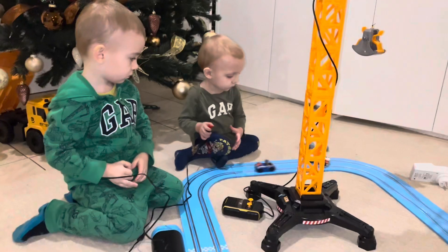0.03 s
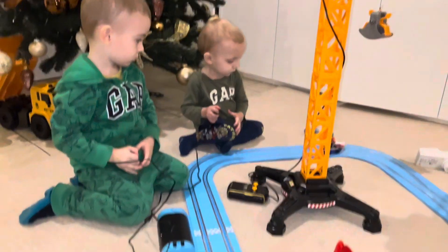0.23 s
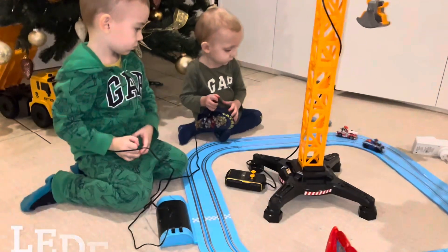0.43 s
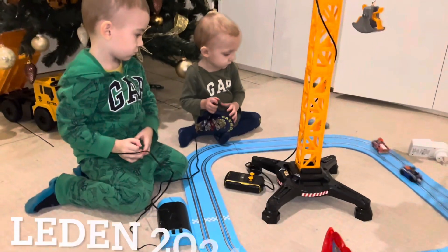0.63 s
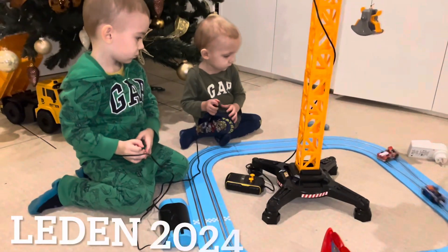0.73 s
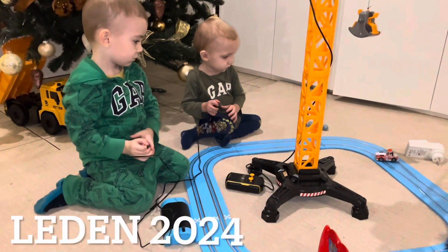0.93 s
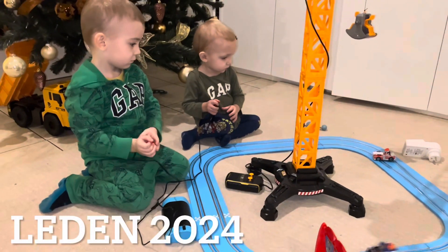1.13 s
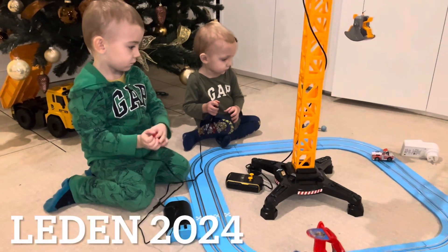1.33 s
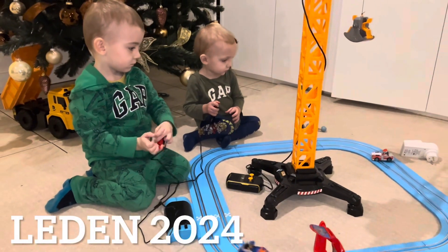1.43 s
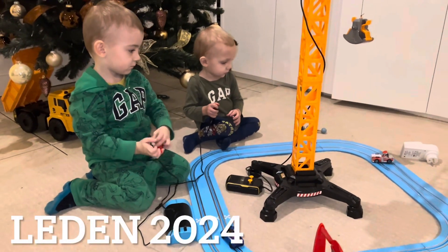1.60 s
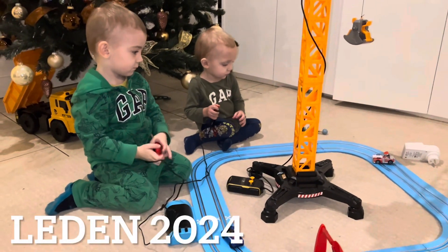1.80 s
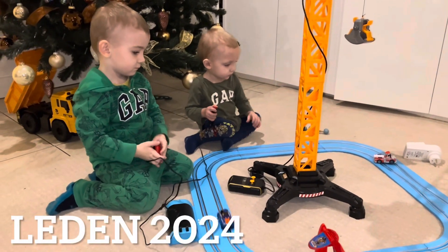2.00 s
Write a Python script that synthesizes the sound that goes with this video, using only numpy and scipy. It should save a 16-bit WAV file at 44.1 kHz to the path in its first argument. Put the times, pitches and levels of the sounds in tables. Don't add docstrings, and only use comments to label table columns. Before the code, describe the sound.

Toy slot cars buzz around a plastic track indoors, pause briefly, and one motor starts whirring again

```python
import sys
import numpy as np
from scipy import signal
from scipy.fft import rfft, irfft, next_fast_len
from scipy.io import wavfile
from scipy.ndimage import uniform_filter1d, map_coordinates

SR = 44100
rng = np.random.default_rng(int(sys.argv[2]) if len(sys.argv) > 2 else 0)


def boost(x):
    u = np.asarray(x, float) / 20
    return 10 ** u


def waveform_to_disk(signal):
    frames = np.transpose(np.atleast_2d(signal))
    scaled = np.clip(frames, -1, 1) * 32767
    samples = np.round(scaled).astype(np.int16)
    wavfile.write(sys.argv[1], SR, samples)


N = 90669
T = np.arange(N) / SR
CHASSIS_CUT_HZ = 543

# centre [Hz], width [Hz], level [dB].
SHELL = [(2108, 233, -1.5), (2402.5, 267, 2.5), (2720, 360, -3), (3650, 554, -6.5), (4990, 1460, -14)]
# start [s], T60 of the rattle [s].
CLICK_TIMES = [
    (.2322, .05),
    (.241, .035),
    (.257, .08),
    (1.2624, .08),
    (1.2692, .02),
    (.72, .08),
]
# level [dB], treble [dB], air [dB], first contact [dB].
CLICK_LEVELS = [
    (-15, -3, -2, -19),
    (-12, -12, -10, -17),
    (-19, -8, -15, -40),
    (-22, -3, -8, -25),
    (-29, 3, 0, -26),
    (-26.5, -10, -13, -45),
]
# start [s], length [s], pitch [Hz].
HUM_TONES = [(1.88, .105, 750), (1.945, .07, 300), (1.925, .08, 940), (2.0, .06, 850), (2.02, .05, 980),
             (2.0, .07, 1400), (.19, .07, 700), (.6, .15, 585), (.08, .07, 1280), (.08, .07, 1420),
             (1.15, .3, 2430), (1.26, .08, 728)]


def unit(x):
    return x / np.sqrt(np.mean(x ** 2) + 1e-20)


def along(points, hz):
    f, v = np.transpose(points)
    return np.interp(np.log(hz + 1), np.log(f + 1), v)


def curves(rows, t=T):
    s, *cols = np.transpose(rows)
    return [np.interp(t, s, c) for c in cols]


def wobble(rate):
    return map_coordinates(rng.standard_normal(2000), [np.arange(N) * rate / SR])


def swell(s, length):
    return np.sin(np.pi * np.clip((T - s) / length, 0, 1))


def filtered(x, response):
    m = next_fast_len(N + SR // 2)
    return irfft(rfft(x, m) * response(np.fft.rfftfreq(m, 1 / SR)), m)[..., :N]


def body(x, peaks):
    def response(f):
        total = 0
        for k, (centre, width, db) in enumerate(peaks):
            damping = 1j * f * width
            total = total + (-1) ** k * boost(db) * damping / (centre ** 2 - f * f + damping)
        return total
    return filtered(x, response)


def high(x, cut_hz):
    return filtered(x, lambda hz: 1 / (1 + (cut_hz / (hz + 1)) ** 16))


def rattle(rate, scatter, hiss_db):
    size_db, knock_s = 5, 0.005
    size, shift = rng.standard_normal((2000, 2)).T
    teeth = np.arange(1, 2001) + scatter * np.tanh(shift)
    at = np.searchsorted(np.cumsum(rate) / SR, teeth)
    blows = np.bincount(at, boost(size_db * size), N + 1)[:N]
    gate = np.abs(signal.lfilter([1], [1, -np.exp(-1 / (knock_s * SR))], blows))
    gate /= np.sqrt(np.abs(uniform_filter1d(gate ** 2, size=2600)) + 1e-3)
    return (gate + boost(hiss_db)) * rng.standard_normal((2, N))


def patchy(x):
    z = signal.stft(x, nperseg=512)[2]
    field = uniform_filter1d(rng.standard_normal(z.shape[1:]), size=5, axis=0)
    field = uniform_filter1d(field, size=8, axis=1)
    return signal.istft(z * boost(3 * unit(field)), nperseg=512)[1][:, :N]


def cars():
    # time in seconds, then level, brightness, chassis and hollow track in dB.
    run = [(.05, -49, 7.5, 4.5, 8.5), (.11, -36, 1, 1.5, 0), (.21, -40.5, 3, 1.5, 3), (.3, -40, 6, 1, 6),
           (.4, -40, 2.5, 7, 2.5), (.52, -40, 5, 2, -23), (.62, -38, 2.5, 2.5, -3),
           (.7, -35.5, 1.5, -2, -7), (.76, -37.5, 1, 8.5, 4.5), (.88, -40, 3.5, 1, 1),
           (.97, -40, 5, 0, -21), (1.06, -40.5, 3.5, 3, -1), (1.12, -38, 2, 1.5, 12.5),
           (1.25, -36.5, -1.5, 2, 5.5), (1.33, -33.5, 0, -0.5, 9.5), (1.47, -40, 10, 1.5, 9.5),
           (1.55, -42, 0.5, -0.5, -27), (1.8, -74.5, -1, -7, -11)]
    # resonance in Hz, width in Hz, level in dB.
    chassis = [(596, 74, -7.5), (758, 101, -6.5), (1050, 335, -7.5), (1512, 386, -9)]
    axle = [(5900, 880, -10), (9200, 1300, -12.5), (10500, 5100, -18), (16200, 530, -71)]
    track_peaks = [(309, 47, -22), (449, 39, -15.5)]
    # time in seconds, level over the shell in dB.
    whine_level = [
        (.05, 0.5),
        (.3, -6.5),
        (.57, -4),
        (.69, -3),
        (.9, -13.5),
        (1.15, -16),
        (1.35, -4),
        (1.5, -1),
        (1.75, -6.5),
    ]
    # frequency in Hz, density in dB per Hz.
    rumble = [(20, -15), (60, -10.5), (130, 0.5), (230, -0.5), (300, -25), (400, -60)]
    teeth_per_s, scatter, hiss_db = 700, 0.45, 1
    power_off_s, power_off_db, leak_db, rumble_db = 1.479, -6, -16.5, -45.5

    level_db, bright_db, chassis_db, hollow_db = curves(run)
    drive = patchy(rattle(np.full(N, teeth_per_s), scatter, hiss_db))
    shell = body(drive, SHELL)
    narrow = [(2570, 380, 0)]
    whine_db = curves(whine_level)[0] + 3 * wobble(29.86)
    whine = boost(whine_db) * unit(body(body(drive, narrow), narrow)) * np.std(shell)
    car = shell + whine + boost(chassis_db) * body(drive, chassis) + boost(bright_db) * body(drive, axle)
    track = boost(hollow_db + 5.1 * wobble(25.24)) * high(body(drive, track_peaks), 270)
    boards = boost(rumble_db) * unit(filtered(drive, lambda hz: boost(along(rumble, hz))))
    mix = (high(car, CHASSIS_CUT_HZ) + boost(leak_db) * car + track) / np.std(shell) * 0.75
    total_db = level_db + power_off_db * (T > power_off_s) + 0.067 * wobble(16.0)
    return boost(total_db) * (mix + boards)


def squeals():
    # start in seconds, length in seconds, level in dB, pitch in Hz.
    scrapes = [
        (0.996, 0.24, -39.5, 6200),
        (0.51, 0.31, -45.5, 5960),
        (1.373, 0.09, -41.5, 5450),
    ]
    out = np.zeros((2, N))
    for s, length, db, hz in scrapes:
        noise = rng.standard_normal((2, N))
        tone = unit(body(body(noise, [(hz, 750, 0)]), [(hz, 1500, 0)]))
        out += boost(db + 4 * wobble(250)) * swell(s, length) * tone
    return out


def clicks():
    # resonance in Hz, width in Hz, level in dB.
    low_peaks = [(850, 500, -7), (1950, 800, -4), (2700, 700, -1)]
    top_peaks = [(5200, 3300, -4), (9900, 2600, -15)]
    air_peaks = [(11700, 900, -9), (14500, 2800, -16)]
    snap_db, grain_db, air_t60_share, ceiling = 13, 3, 0.62, 0.16
    out = np.zeros((2, N))
    for (s, t60), (db, treble_db, air_db, _) in zip(CLICK_TIMES, CLICK_LEVELS):
        noise = (T >= s) * rng.standard_normal((2, N)) * boost(grain_db * wobble(300))
        noise[0, round(s * SR)] = boost(snap_db)
        age = np.clip(T - s, 0, None)
        dying = noise * boost(-60 * age / t60)
        air = noise * boost(-60 * age / (t60 * air_t60_share))
        click = body(dying, low_peaks) + boost(treble_db) * body(dying, top_peaks)
        click = click + boost(air_db) * high(body(air, air_peaks), 12000)
        out += boost(db) * click
    return high(out / (1 + np.abs(out / ceiling) ** 4) ** 0.25, CHASSIS_CUT_HZ)


def ticks():
    # resonance in Hz, width in Hz, level in dB.
    contact = [(2630, 830, 15.5), (7000, 7200, 4)]
    spark = [(9200, 1500, -9), (12200, 2800, 7), (15400, 1100, 9)]
    # time in seconds, width in seconds, level in dB.
    edges = [
        (0.234, 0.0039, -40),
        (1.2635, .003, -46),
        (1.2684, 0.004, -37),
    ]
    blows = np.zeros(N)
    for (s, _), row in zip(CLICK_TIMES, CLICK_LEVELS):
        blows[round(s * SR)] = 2 * boost(row[-1])
    fizz = unit(high(body(rng.standard_normal(N), spark), 8000))
    flash = sum(boost(db) * np.exp(-((T - s) / width) ** 2) for s, width, db in edges)
    return body(blows, contact) + fizz * flash


def knocks(rows, peaks):
    rise_s, t60_s = 0.00064, 0.021
    start, db = np.transpose(rows)
    age = np.clip(T - start[:, None], 0, None)
    gate = boost(db) @ ((1 - np.exp(-age / rise_s)) * boost(-60 * age / t60_s))
    noise = rng.standard_normal((2, N))
    return body(gate * noise, peaks) / np.std(body(noise, peaks))


def coasting():
    # time in seconds, level in dB.
    last_teeth = [
        (1.448, -37),
        (1.459, -37),
        (1.474, -36),
        (1.516, -43),
        (1.528, -41),
        (1.537, -44),
        (1.589, -47),
        (1.631, -52),
    ]
    return knocks(last_teeth, SHELL)


def restart():
    # time in seconds, level in dB, knocks per second.
    speed_up = [
        (1.77, -74, 60),
        (1.81, -64, 60),
        (1.85, -60, 60),
        (1.88, -48, 80),
        (1.93, -47.5, 186),
        (1.98, -42.5, 250),
        (2.06, -39, 380),
    ]
    # resonance in Hz, width in Hz, level in dB.
    motor_peaks = [(291, 130, -17.5), (1522, 2900, -11.5), (2580, 310, 2.5), (4150, 480, -1),
                   (5900, 1670, -5), (8000, 1900, -10.5), (12500, 7700, -17.5)]
    # time in seconds, level in dB.
    slack_teeth = [(1.811, -73), (1.827, -60.5), (1.841, -44), (1.853, -48), (1.871, -50), (1.887, -48),
                   (1.906, -38), (1.916, -37), (1.929, -50), (1.938, -45), (1.942, -48), (1.956, -44)]
    start_s, mesh_s = 1.77, 1.92
    level_db, rate = curves(speed_up)
    on = T > start_s
    whir = body(rattle(rate * (T > mesh_s), 0.15, -1), motor_peaks)
    return boost(level_db) * on * whir / np.std(whir[:, on]) + knocks(slack_teeth, motor_peaks[2:-1])


def hums():
    tone_db = [-60, -60.5, -65.5, -58, -55, -57, -45, -48.5, -44.5, -50.5, -40, -45.5]
    out = np.zeros((2, N))
    for (s, length, hz), db in zip(HUM_TONES, tone_db):
        level = boost(db + 1.5 * wobble(90)) * np.abs(swell(s, length)) ** 0.5
        phase = 2 * np.pi * np.cumsum(hz * (1 + 0.004 * wobble(90))) / SR
        out += level * np.sin(phase + [[0], [rng.normal(0, 0.57)]])
    return out


def room(x, before):
    # frequency in Hz, T60 in seconds.
    decay = [(300, 0.79), (2500, 0.55), (7000, 0.15), (14000, 0.022)]
    turn_s = 0.2
    whole, out = np.r_[before, x], 0
    time = np.arange(len(whole)) / SR
    for s in np.arange(0, len(whole) / SR + turn_s, turn_s):
        hz, t, z = signal.stft(rng.standard_normal((2, SR // 2)), SR, nperseg=256)
        dying = z * boost(-60 * t / along(decay, hz)[:, None])
        tail = signal.istft(dying, SR, nperseg=256)[1]
        part = whole * np.cos(np.pi / 2 * np.clip((time - s) / turn_s, -1, 1))
        out = out + signal.fftconvolve(part[None], tail / np.linalg.norm(tail[0]), axes=1)
    return out[:, len(before) - 300:][:, :N]


def hush():
    # frequency in Hz, density in dB per Hz.
    floor = [(20, -44), (60, -21), (150, -19.5), (500, -21), (1000, -12.5), (2500, -18.5), (6000, -27),
             (15000, -55)]
    noise = rng.standard_normal((2, N))
    return boost(-64) * unit(filtered(noise, lambda hz: boost(along(floor, hz))))


def ports(pair):
    # frequency in Hz, likeness of the ports from 0 to 1.
    alike = [(60, 0.2), (250, 1), (700, 0.27), (2500, 0.044), (6000, 0.093), (9000, 0.13), (13000, 0.2)]
    # frequency in Hz, radians by which the left port leads.
    left_lead = [(0, 0.5), (7000, -6), (8500, -10.5), (10300, -8.5), (11500, -10), (12200, -14), (14000, 2),
                 (15500, -24)]

    def blend(hz):
        angle = np.arccos(np.clip(along(alike, hz), -1, 1)) / 2
        return np.array([np.cos(angle), np.sin(angle)])

    def lead(hz):
        half = 0.5 * np.interp(hz, *np.transpose(left_lead))
        return np.exp(1j * half * np.array([[1], [-1]]))

    same, other = filtered(pair, blend)
    return filtered(np.array([same + other, same - other]), lead)


def scene():
    run_room, click_room = boost(-6), boost(-0.5)
    running = cars() + squeals() + restart() + coasting()
    snaps = clicks()
    earlier = run_room * running[0, SR // 2::-1]
    wet = room(run_room * running[0] + click_room * snaps[0], earlier)
    return ports(running + snaps + wet + hush()) + hums() + ticks()


def roll_off(x):
    return signal.sosfilt(signal.butter(12, 15810, fs=SR, output="sos"), x)


def record(dry):
    # time in seconds, centre in Hz, width in Hz, depth in dB.
    low_hole = [(.24, 570, 80, 0), (.3, 570, 80, 7), (.57, 560, 80, 9), (.64, 480, 70, 5),
                (.74, 440, 90, 0), (1.56, 320, 100, 0), (1.66, 370, 130, 26), (1.785, 410, 150, 32),
                (1.81, 490, 100, 18), (1.87, 540, 130, 27), (1.92, 570, 110, 22), (2, 560, 120, 18),
                (2.05, 620, 60, 16)]
    high_hole = [
        (1.81, 800, 200, 0),
        (1.85, 950, 300, 18),
        (1.875, 1100, 400, 26),
        (1.91, 1300, 430, 30),
        (1.94, 1300, 350, 24),
        (1.98, 1150, 250, 18),
        (2.02, 1120, 150, 18),
        (2.06, 1150, 80, 5),
    ]
    port_null = [(0, 10400, 450, 5), (.17, 10300, 500, 10), (.24, 10400, 400, 0), (.33, 10700, 400, 12),
                 (.42, 10500, 450, 4), (.74, 10300, 450, 4), (.8, 10300, 550, 9), (.9, 10300, 650, 17),
                 (.97, 10400, 500, 5), (1.03, 10300, 650, 14), (1.12, 10400, 400, 4),
                 (1.22, 10300, 650, 15), (1.27, 10400, 400, 0), (1.32, 10500, 750, 15),
                 (1.44, 9900, 1100, 20), (1.48, 10400, 500, 6), (1.6, 10400, 500, 13),
                 (2.06, 10100, 350, 15)]
    top_edge = [
        (0, 14800, 500, 0),
        (.24, 14800, 500, 0),
        (.3, 14800, 500, 4),
        (1.1, 14700, 700, 5),
        (1.22, 14400, 1000, 9),
        (1.26, 14800, 500, 0),
        (1.31, 14600, 800, 8),
        (1.38, 14900, 500, -9),
        (1.46, 14700, 700, 7),
        (2.06, 14800, 500, 3),
    ]
    # frequency in Hz, tone in dB.
    mid_tone = [(14200, 0), (14700, -8), (15300, -12), (20000, -16)]
    side_tone = [(6800, 0), (7300, -6), (7800, 0), (11500, 0), (12000, -30), (14100, -30), (14400, 0)]

    left, right = dry
    mid_side = np.array([left + right, left - right]) / 2
    hz, t, z = signal.stft(mid_side, SR, nperseg=1024, noverlap=768)
    tones = 0
    for s, length, f in HUM_TONES:
        tones = tones + np.exp(-((hz[:, None] - f) / 45) ** 2) * ((t > s) & (t < s + length))
    spared = np.clip(1 - tones, 0, 1)
    null_swing_db = np.interp(t, T, 2 * wobble(14.6))
    edge_swing_db = np.interp(t, T, 3 * wobble(23.8))
    mid_only = np.reshape([1, 0], (2, 1, 1))
    holes = ((low_hole, 1, 0), (high_hole, 1, 0),
             (port_null, mid_only, null_swing_db), (top_edge, 1, edge_swing_db))
    for hole, share, swing_db in holes:
        centre, width, depth_db = curves(hole, t)
        shape = np.exp(-((hz[:, None] - centre) / width) ** 4)
        z = z * boost(-(depth_db + swing_db) * share * spared * shape)
    pair = signal.istft(z, SR, nperseg=1024, noverlap=768)[1][:, :N]
    mid, side = filtered(pair, lambda f: boost([along(mid_tone, f), along(side_tone, f)]))
    fade_in = np.clip((T - 0.034) / 0.04, 0, 1)
    return roll_off(np.array([mid + side, mid - side]) * fade_in)


dry = scene()
out = record(dry)
waveform_to_disk(out)
```